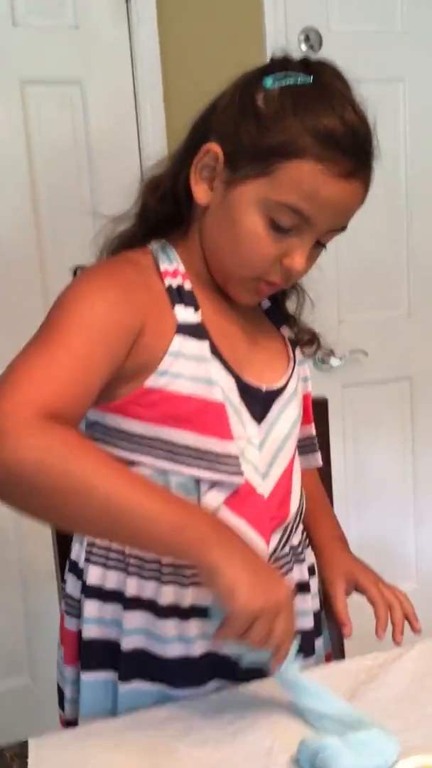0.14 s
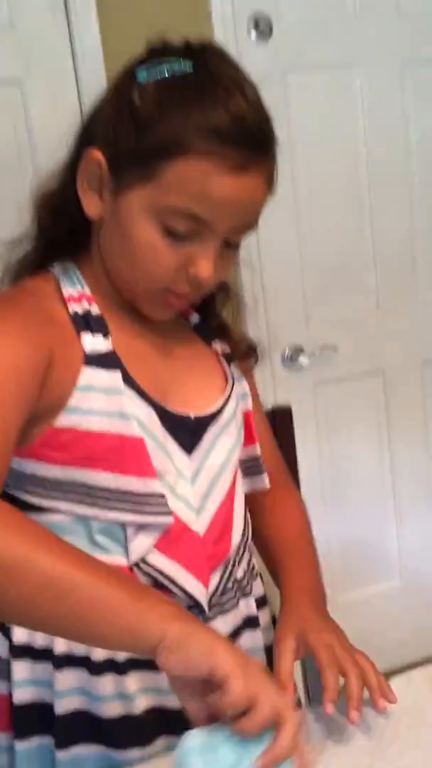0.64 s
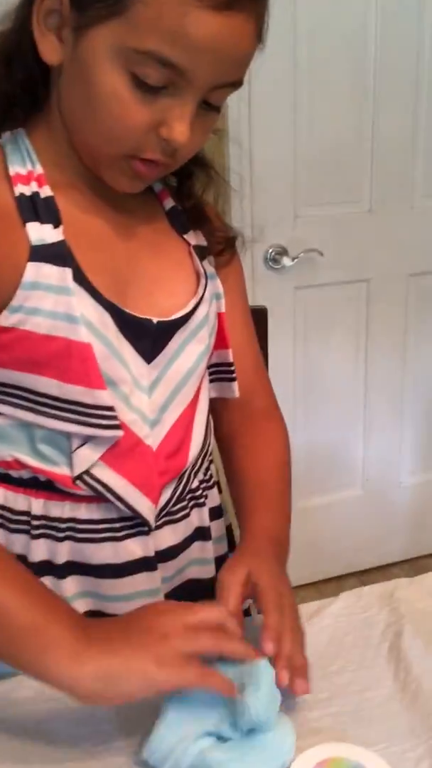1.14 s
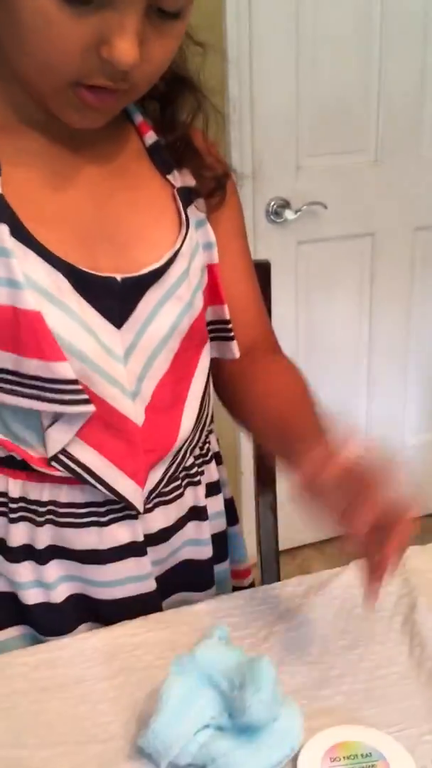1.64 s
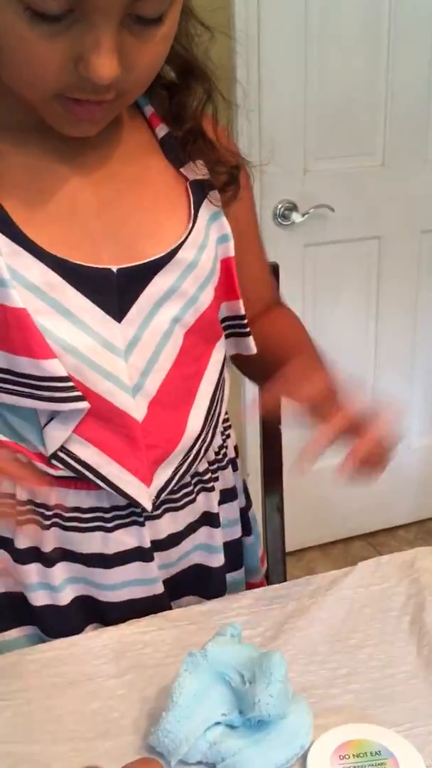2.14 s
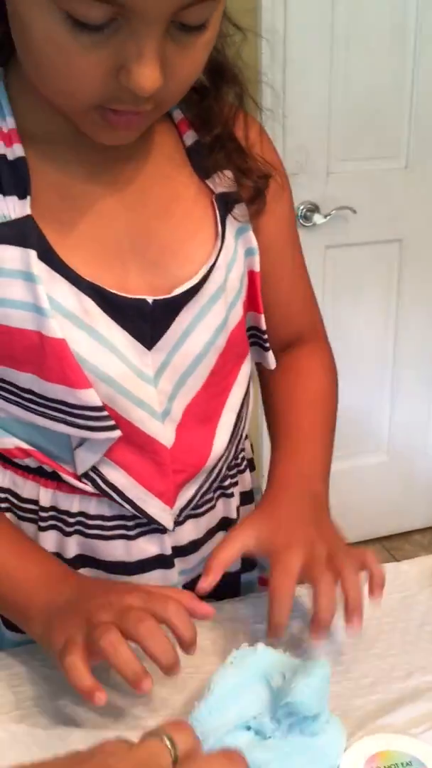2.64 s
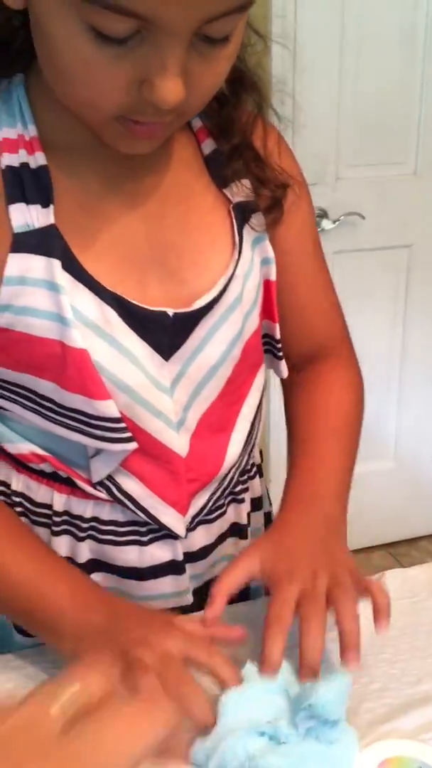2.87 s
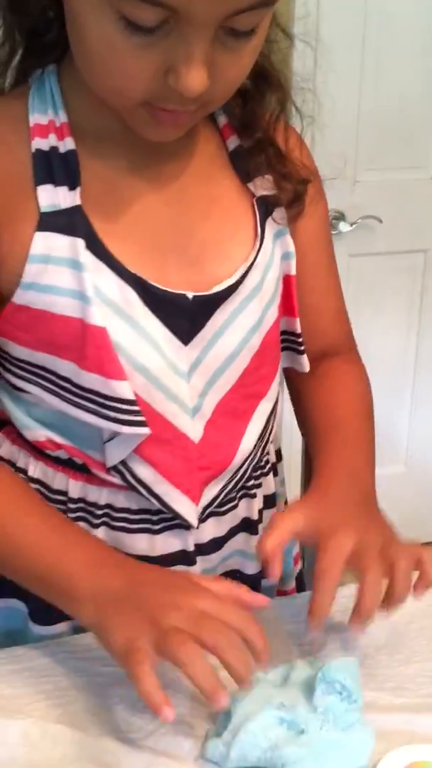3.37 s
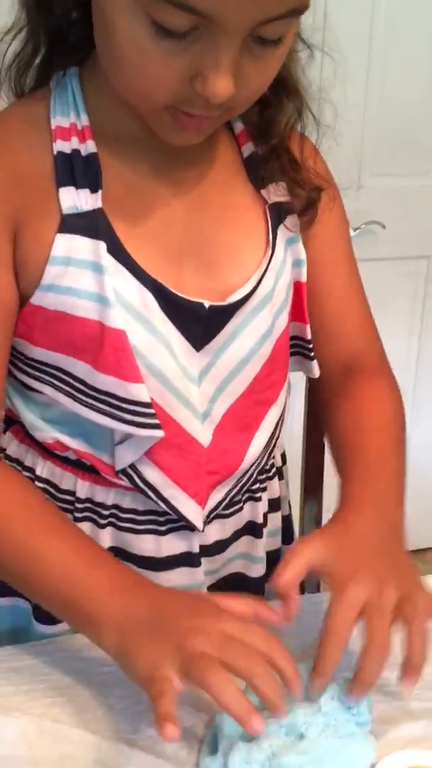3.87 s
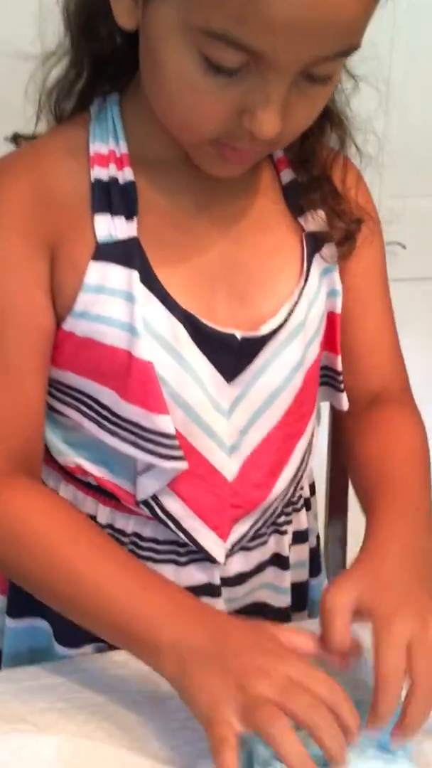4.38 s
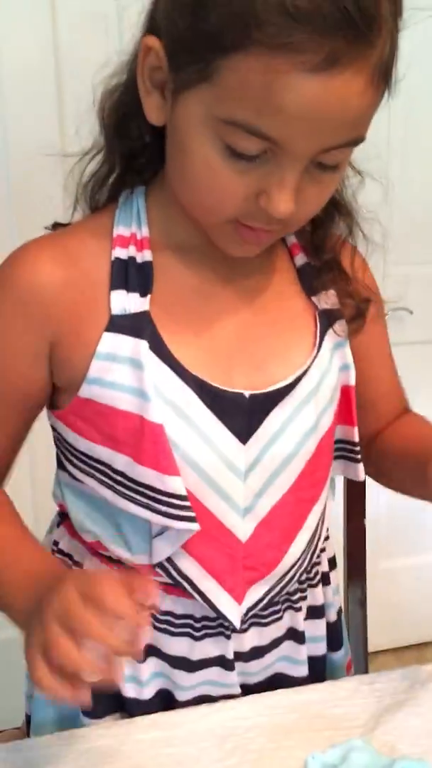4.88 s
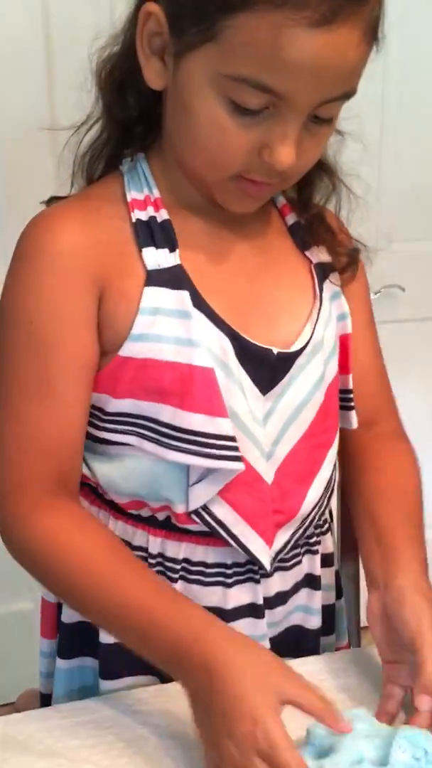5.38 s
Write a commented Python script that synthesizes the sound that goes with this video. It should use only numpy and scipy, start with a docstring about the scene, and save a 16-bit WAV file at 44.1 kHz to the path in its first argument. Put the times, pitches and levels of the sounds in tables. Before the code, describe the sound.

Close to the microphone in a small room, fluffy slime is handled on a paper-covered table. A soft crackle and dull low bump open it, with a cluster of crisp little snaps around 0.1 s. Gentle rustling continues to 1 s, then nearly fades, leaving isolated ticks and barely audible thin tones. Low bumps come near 1.8 s, bright snaps at 2.1 s, and a denser crackle with a small pop and thud around 2.5 s. After a lull near 2.9 s, fine snaps gather quickly from 3.0 s, leading to one loud, sharp, hollow wet pop with a table knock at 3.3 s, by far the strongest event. Smaller pops follow at about 3.75, 4.25, 4.6 and 4.75 s amid soft crackling. It then thins to sparse ticks, a low bump near 5.15 s and a last faint snap, pop and bump at 5.45 s. Quiet rumble and air hush lie beneath.

```python
"""A soft crackle and a dull low bump come first: fluffy slime is worked by hand on a paper-covered table.
It is pulled, dropped and poked. Noise and bursts of tiny foam cells swell with every hand stroke.
Clear snaps are short ringing tones; air pockets pop with falling cycles, a wet splat and a table thud.
Low bumps, faint thin tones, a rumble and a hush lie underneath, and a small room answers."""
import sys
import numpy as np
from scipy import signal
from scipy.io import wavfile
from scipy.ndimage import uniform_filter1d

SR = 44100
rng = np.random.default_rng(int(sys.argv[2]) if len(sys.argv) > 2 else 0)


def generate_wav(signal):
    """Clip the signal to [-1, 1] and save it as 16-bit WAV at the path in sys.argv[1]."""
    frames = np.transpose(np.atleast_2d(signal))
    scaled = np.clip(frames, -1, 1) * 32767
    pcm = np.round(scaled).astype(np.int16)
    wavfile.write(sys.argv[1], SR, pcm)


def magnitude_from_level(level_db):
    """Linear magnitude for a level in decibels (20 dB per decade)."""
    exponent = np.asarray(level_db, float) / 20
    return 10 ** exponent


N = 242550  # length of the scene [samples]

# hand strokes that work the slime; rise and fall each span 10 dB:
# (peak time [s], rise [s], fall [s], crackle level [dB], treble tilt [dB per octave])
STROKES = [(0.03, 0.15, 0.27, -62, 2.5), (0.111, 0.0059, 0.072, -59, 0.5),
           (0.215, 0.016, 0.079, -59.5, -0.5), (0.3, 0.067, .07, -64, 4), (0.55, 0.11, .12, -63, 1),
           (0.68, 0.23, 0.11, -63.5, 0.5), (0.78, 0.1, 0.089, -63.5, 1), (0.88, 0.12, 0.021, -63, -4),
           (1.0, 0.051, 0.088, -64, -4.5), (1.2, 0.15, 0.071, -70.5, -41), (1.48, 0.058, 0.31, -64, 2.5),
           (1.66, 0.11, 0.29, -60, 3), (1.982, 0.015, 0.095, -63, 3.5), (2.121, 0.14, 0.084, -63.5, 5.5),
           (2.24, 0.17, 0.09, -63, -12), (2.47, 0.21, 0.24, -61.5, 3.5), (2.534, 0.044, 0.1, -57.5, -0.5),
           (2.68, 0.02, 0.051, -65.5, 1.5), (2.93, 0.1, 0.17, -72.5, -0.5), (3.0, 0.067, .03, -68, -1.5),
           (3.045, .02, 0.036, -70.5, 5.5), (3.087, 0.015, 0.02, -63, 1.5), (3.17, 0.052, 0.064, -59.5, 0),
           (3.235, 0.031, 0.054, -52.5, 2), (3.328, 0.016, .12, -44.5, -6.5), (3.58, 0.082, 0.16, -61, 0),
           (3.764, 0.016, 0.021, -47.5, 0), (3.82, 0.18, 0.23, -57, 0.5), (3.95, 0.063, 0.048, -61, 2.5),
           (4.04, 0.12, 0.27, -64.5, 2.5), (4.241, 0.012, 0.017, -47.5, 1.5), (4.27, 0.055, 0.11, -58, 1),
           (4.47, 0.15, 0.15, -69.5, -1), (4.54, 0.044, 0.076, -65, 1), (4.6, 0.011, 0.22, -69, 0),
           (4.68, 0.047, 0.12, -69, 2), (4.738, 0.012, 0.083, -57.5, 2), (4.93, 0.12, 0.054, -74, 0),
           (4.982, 0.0087, 0.056, -61.5, 1.5), (5.119, 0.039, 0.093, -63, 0), (5.33, 0.18, 0.26, -70, 0.5),
           (5.439, 0.0071, 0.2, -69, 5.5)]
# colour of crackling cells and paper: (frequency [Hz], relative level [dB])
CRACKLE_COLOUR = [(150, -17.5), (250, -14), (320, -0.5), (498, -4.5), (788, -2.5), (845, -3), (1200, -2.5),
                  (2150, 0.5), (2760, -4), (3720, -5.5), (4850, -11.5), (5590, -8), (8540, -11.5),
                  (13800, -13.5), (17000, -19)]
# single foam cells that snap clearly: (time [s], level [dB], pitch [Hz])
SNAPS = [(0.0602, -38.5, 4280), (0.109, -38, 3150), (0.1137, -36.5, 3960), (0.1237, -41, 3800),
         (0.2137, -47, 4600), (0.528, -53, 3100), (0.571, -42, 2250), (0.6188, -42, 7000),
         (0.7812, -44.5, 5650), (1.0463, -48.5, 9050), (1.191, -52.5, 2485), (1.281, -52, 8300),
         (1.369, -52, 9100), (1.6306, -41, 4670), (2.1035, -33.5, 8460), (2.1278, -37, 6430),
         (2.164, -36.5, 6350), (2.462, -45, 3830), (2.4681, -36, 6500), (2.5136, -34.5, 4250),
         (2.55, -34.5, 6540), (2.568, -40.5, 4600), (2.6284, -41, 6650), (2.658, -43, 6600),
         (2.9688, -49, 7200), (2.998, -43, 3960), (3.0055, -46, 7100), (3.0383, -47, 3870),
         (3.043, -47, 8400), (3.0473, -45, 5760), (3.0834, -37, 6000), (3.101, -46, 3500),
         (3.122, -40, 9200), (3.131, -38, 9300), (3.141, -42, 6130), (3.158, -44, 3080),
         (3.1669, -38, 4600), (3.1855, -38, 4400), (3.2325, -32, 7800), (3.246, -34.5, 3760),
         (3.2572, -32.5, 6700), (3.3186, -16, 3450), (3.3179, -22, 8800), (3.578, -45, 5860),
         (3.601, -42, 5300), (3.618, -43.5, 6550), (3.7595, -33, 2140), (3.76, -31.5, 3270),
         (3.8155, -42, 6200), (4.203, -47, 3770), (4.23, -39, 5800), (4.2372, -34.5, 2050),
         (4.2384, -35, 4100), (4.2846, -41, 4060), (4.3036, -43.5, 4300), (4.443, -46.5, 11000),
         (4.653, -42, 13400), (4.638, -56, 2620), (4.6712, -52, 3600), (4.6908, -46, 6300),
         (4.7346, -30, 6850), (4.7756, -41, 6800), (4.9507, -50, 3300), (4.9794, -43, 3950),
         (5.1296, -36, 9600), (5.1489, -46, 6470), (5.2106, -52.5, 3740), (5.4386, -41, 6540),
         (5.4468, -42.5, 4500)]
# air pockets that pop: (time [s], pop level [dB], cavity pitch [Hz], table thud level [dB],
# wet splat level before colouring [dB])
POPS = [(2.538, -40.5, 1100, -36.5, -62), (3.081, -69, 650, -45.5, -48), (3.174, -42, 1320, -51, -57),
        (3.3185, -16, 1527, -17.5, -15), (3.711, -44.5, 554, -49, -53), (3.7643, -39.5, 920, -42, -52),
        (4.2374, -37, 864, -40.5, -41), (4.5855, -38.5, 830, -43, -50), (4.612, -47.5, 980, -64, -62),
        (4.672, -46.5, 1050, -65, -45), (4.7345, -43, 583, -55, -39), (5.444, -50.5, 1080, -51, -52)]
# ringing tones of the table top: (frequency [Hz], relative level [dB], time to die by 60 dB [s])
TABLE_TONES = [(120, -26.5, 0.4), (154, -14, 0.053), (231, -10.5, 0.043), (279, 3.5, 0.017),
               (295, -3.5, 0.035), (437, -6.5, 0.05), (560, -14, 0.052), (907, -5.5, 0.03)]
# colouring of the wet splat: (frequency [Hz], gain [dB])
SPLAT_COLOUR = [(300, -52), (750, -34), (1100, 2), (1900, -1), (2600, -9), (4200, -17.5), (6000, -29),
                (12000, -56)]
# dull low bumps through the furniture: (time [s], level [dB], starting pitch [Hz])
BUMPS = [(0.034, -41, 99), (1.78, -36, 144), (1.804, -40, 120), (2.173, -43, 131), (2.559, -35.5, 104),
         (3.772, -38, 110), (4.729, -40.5, 109), (5.152, -42, 146), (5.447, -40.5, 156)]
# faint thin tones: (start [s], end [s], start pitch [Hz], end pitch [Hz], level [dB])
THIN_TONES = [(0.999, 1.154, 610, 647, -76.5), (1.07, 1.322, 1850, 1885, -74), (1.24, 1.506, 496, 472, -76),
              (1.597, 1.636, 295, 504, -58.5), (1.634, 1.718, 2210, 2050, -63)]
# how long the room rings: (frequency [Hz], time to die by 60 dB [s])
ROOM_DECAY = [(100, 0.65), (260, 0.29), (480, 0.51), (750, 0.48), (1100, 0.49), (1840, 0.14), (4850, 0.23),
              (12000, 0.17)]
# weight shifting on table and floor: (time [s], level [dB])
RUMBLE_LEVEL = [(0.0, -58.5), (0.12, -65), (0.41, -71), (1.209, -80), (1.58, -67), (2.2, -66.5),
                (2.35, -71.5), (2.68, -60), (3.0, -81.5), (3.14, -61.5), (3.41, -62), (3.71, -64.5),
                (3.83, -65), (4.0, -70), (4.6, -64.5), (4.8, -62), (5.02, -64.5), (5.16, -58), (5.5, -81)]
# colour of that rumble: (frequency [Hz], relative level [dB])
RUMBLE_COLOUR = [(12, -11), (20, -49), (49, 2.5), (97, 1.5), (190, -7.5), (284, -7), (329, -7),
                 (392, -16.5), (500, -27), (650, -45), (1100, -120)]
# colour of the room's air noise: (frequency [Hz], relative level [dB])
HUSH_COLOUR = [(25, -39), (60, -3.5), (130, -7.5), (300, -23), (700, -24), (1400, -29), (2000, -47),
               (3000, -39), (8000, -41), (17000, -46)]
# tone of the microphone: (frequency [Hz], gain [dB])
MIC_TONE = [(25, 0), (60, 2.5), (120, 0.5), (3500, 7.5), (4300, 10), (4950, 8.5), (5600, 8.5), (7000, 8),
            (7600, 6), (8800, 10), (10300, 5), (11300, 7.5), (12500, 6)]

REST_DB, REST_TILT_DB = -82, -8  # slime left alone still ticks, dully; tilt is per octave
SWELL_POWER = 1.26  # shape of each stroke's swell
PIVOT_HZ, TREBLE_DIES = 2150, 0.31  # how much sooner each octave above the pivot fades
# quick strokes gain body below BODY_HZ for each halving of the rise; slow ones lose some
BODY_HZ, SLAP_DB, USUAL_RISE_S = 1400, 1, 0.12
# at first the slime is drawn out in a strand, whose tearing cells favour this band
STRETCH_ENDS_S, STRETCH_HZ, STRETCH_OCTAVES, STRETCH_DB = 1.1, 3600, 0.35, 2.5
POP_S = 0.0032  # time scale on which a pop dies
HUSH_DB = -68


def crackle(clump_db=1.0, flicker_db=0.5, hiss=1.64):
    """Bursting cells and paper hiss come in clumps; hand strokes set their level and colour."""
    clumps = uneven(400)
    flicker = uneven(90)
    fizz = grains(per_s=300, spread_db=3.0, cycles=4.0)
    rustle = fizz + hiss * rng.standard_normal(N)
    rustle = rustle * magnitude_from_level(clump_db * clumps + flicker_db * flicker)
    rustle = coloured(rustle, CRACKLE_COLOUR)
    hz, t, z = signal.stft(rustle, SR, nperseg=256, noverlap=192)
    z = z * handling(hz[:, None], t)
    return signal.istft(z, SR, nperseg=256, noverlap=192)[1][:N]


def handling(hz, t):
    """Gain over pitch and time: strokes swell and fade, treble fading sooner; their powers add."""
    above = np.clip(np.log2(hz / PIVOT_HZ + 1e-9), 0, 1.5)  # octaves above the pivot
    body = 1 / (1 + (hz / BODY_HZ) ** 4)
    octaves_off = np.log2(hz / STRETCH_HZ + 1e-9)
    strand_band = np.exp(-(octaves_off / STRETCH_OCTAVES) ** 2)
    power = magnitude_from_level(2 * (REST_DB + REST_TILT_DB * above)) * np.ones_like(t)
    for s, rise, fall, db, tilt_db in STROKES:
        before = (s - t) / rise
        after = (t - s) / fall * (1 + TREBLE_DIES * above)
        away = np.where(t < s, before, after)
        strand_db = STRETCH_DB * (s < STRETCH_ENDS_S) * strand_band
        slap_db = SLAP_DB * np.log2(USUAL_RISE_S / rise) * body
        stroke_db = db + strand_db + tilt_db * above + slap_db - 10 * away ** SWELL_POWER
        power += magnitude_from_level(2 * stroke_db)
    return np.sqrt(power)


def grains(per_s, spread_db, cycles):
    """Cells of many sizes burst at random, each a few cycles at its own pitch."""
    out = np.zeros(N)
    for hz in np.geomspace(500, 16000, num=22):
        size = magnitude_from_level(spread_db * np.minimum(rng.exponential(1, N), 5))
        bursts = size * (rng.random(N) < per_s / SR)  # per_s bursts at each pitch
        t = np.arange(-300, 300) / SR * hz / cycles
        one_cell = np.exp(-8 * t ** 2) * np.sin(2 * np.pi * cycles * t)
        out += hz * signal.oaconvolve(bursts, one_cell, "same")
    return evened(out)


def snaps():
    """Each snap swells within a cycle and rings its cell for a few more, with a spit of wet noise."""
    out = np.zeros(N)
    t = np.arange(300) / SR
    spit_shape = magnitude_from_level(-60 * t / 0.011) * 0.36 * np.minimum(t / 0.00035, 1)
    for s, db, hz in SNAPS:
        puff = rng.standard_normal(300)
        spit = signal.lfilter([0.5], [1, -0.5], puff) * spit_shape
        cell = ring(hz, 12.3 / hz, rise=0.91 / hz)[:300]
        add(out, s, magnitude_from_level(db) * (cell + spit))
    return out


def pops():
    """The cavity sounds a few falling cycles, wet film splats, and the blow rings the table after."""
    out, wet = np.zeros(N), np.zeros(N)
    t = np.arange(1000) / SR
    u = t / POP_S
    sweep = 1.06 * t - 0.067 * t * np.minimum(u, 1)  # the pitch drops as the pocket opens
    pop_shape = np.tanh(6 * u) * np.exp(-1.6 * u ** 3)
    thud = table_thud()
    for s, db, hz, thud_db, wet_db in POPS:
        add(out, s, magnitude_from_level(db) * pop_shape * np.sin(2 * np.pi * hz * sweep))
        add(out, s + 0.00211, magnitude_from_level(thud_db) * thud)
        add(wet, s, magnitude_from_level(wet_db - 60 * t / 0.045) * rng.standard_normal(1000))
    return out + colour(wet, SPLAT_COLOUR)


def table_thud():
    """The struck table top rings at several pitches, each dying at its own speed."""
    thud = sum(magnitude_from_level(db) * ring(hz, t60, rise=0.0013) for hz, db, t60 in TABLE_TONES)
    # a small top radiates no deep bass
    return signal.lfilter(*signal.butter(2, 110, "high", fs=SR), thud)


def bumps():
    """Each bump is a low push of little more than one cycle, its pitch falling."""
    out = np.zeros(N)
    for s, db, hz in BUMPS:
        add(out, s, -magnitude_from_level(db) * ring(hz, 0.042, glide=-2.0, rise=0.0016))
    return out


def tones():
    """Thin tones swell, waver in pitch and fade."""
    out = np.zeros(N)
    for start, end, from_hz, to_hz, db in THIN_TONES:
        count = round((end - start) * SR)
        waver = evened(uniform_filter1d(rng.standard_normal(SR), size=900))[:count]
        pitch = np.linspace(from_hz, to_hz, count) * (1 + 0.012 * waver)
        turns = np.cumsum(pitch) / SR
        swell = np.sin(np.pi * np.linspace(0, 1, count) ** 0.82)
        add(out, start, magnitude_from_level(db) * swell * np.sin(2 * np.pi * turns))
    return out


def room(x):
    """Sparse echoes of random sign, each band dying at its own speed."""
    taps = np.zeros(SR)
    at = np.arange(200, SR - 20, 20)
    taps[at + rng.integers(0, 20, len(at))] = rng.choice([-1.0, 1.0], len(at))
    hz, t, z = signal.stft(taps, SR, nperseg=256)
    fade = magnitude_from_level(-60 * t / read(ROOM_DECAY, hz)[:, None])
    tail = signal.istft(z * fade, SR, nperseg=256)[1]
    return signal.fftconvolve(x, tail / np.linalg.norm(tail))[:N]


def rumble():
    """Low lumps of noise carried through the furniture as weight shifts."""
    s, db = np.transpose(RUMBLE_LEVEL)
    level = magnitude_from_level(np.interp(np.arange(N) / SR, s, db))
    return level * coloured(rng.standard_normal(N), RUMBLE_COLOUR)


def hush():
    """Steady air noise of the room."""
    return magnitude_from_level(HUSH_DB) * coloured(rng.standard_normal(N), HUSH_COLOUR)


def ring(hz, t60, glide=0.0, rise=0.0005):
    """A tone with a soft start that dies by 60 dB in t60 seconds."""
    t = np.arange(SR // 4) / SR
    shape = magnitude_from_level(-60 * t / t60) * (1 - np.exp(-t / rise))
    return shape * np.sin(2 * np.pi * hz * t * (1 + glide * t))


def uneven(size):
    """Slow random ups and downs: noise averaged twice over size samples."""
    smooth = uniform_filter1d(rng.standard_normal(N), size=size)
    return evened(uniform_filter1d(smooth, size=size))


def colour(x, points):
    """Filters by a spectrum, with causal phase so that clicks keep a sharp front."""
    hz = abs(np.fft.fftfreq(8192, 1 / SR))
    log_gain = np.log(magnitude_from_level(np.maximum(read(points, hz), -100)))
    taps = np.fft.ifft(np.exp(np.conj(signal.hilbert(log_gain)))).real[:4096]
    return signal.oaconvolve(x, taps)[:N]


def coloured(x, points):
    """Filters by a spectrum and scales to an rms of 1."""
    return evened(colour(x, points))


def evened(x):
    """Scales to an rms (average strength) of 1."""
    return x / np.sqrt(np.mean(x ** 2) + 1e-20)


def read(points, hz):
    """Reads a table of frequencies and values on a log-frequency axis."""
    f, value = np.transpose(points)
    return np.interp(np.log(hz + 1), np.log(f + 1), value)


def add(mix, s, sound):
    """Mixes a sound in at time s, in seconds."""
    part = mix[round(s * SR):][:len(sound)]
    part += sound[:len(part)]


def scene():
    """Hands, slime and table sound in the room, which gets less of the rustle than of the rest."""
    rustle, popped = crackle(), pops()
    close = snaps() + bumps()
    far = room(magnitude_from_level(-9.0) * popped + magnitude_from_level(-8.5) * close + magnitude_from_level(-14.5) * rustle)
    mix = rustle + popped + close + far + tones() + rumble() + hush()
    return mix[None]


def band_limit(x):
    """A steep low-pass at the top of the band."""
    return signal.sosfilt(signal.butter(12, 18330, fs=SR, output="sos"), x)


def record(dry):
    """The microphone tints the sound, and a steep filter removes the top above 17250 Hz."""
    edge = signal.firwin(1023, 17250, window=("kaiser", 9), fs=SR)
    mix = signal.oaconvolve(colour(dry[0], MIC_TONE), edge, "same")[None]
    return band_limit(mix)


dry = scene()
out = record(dry)
generate_wav(out)
```